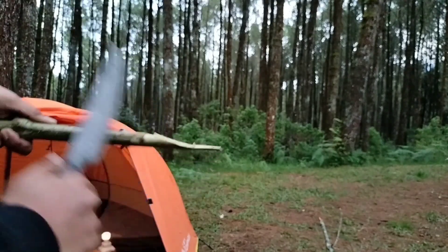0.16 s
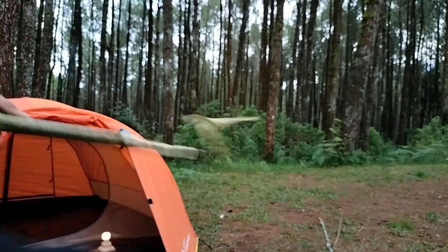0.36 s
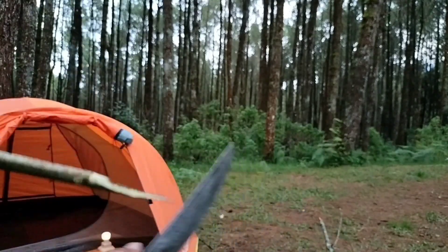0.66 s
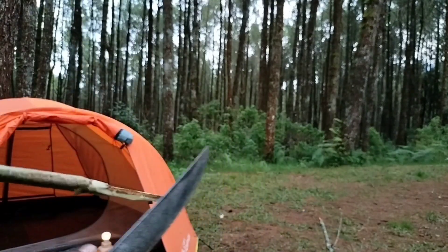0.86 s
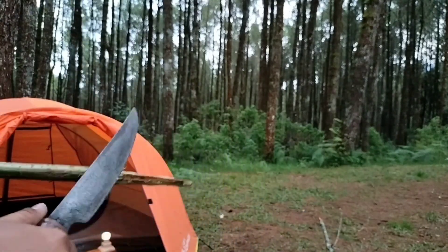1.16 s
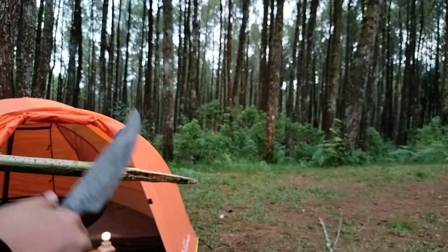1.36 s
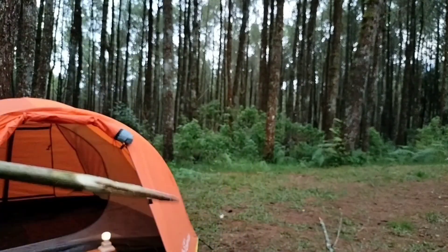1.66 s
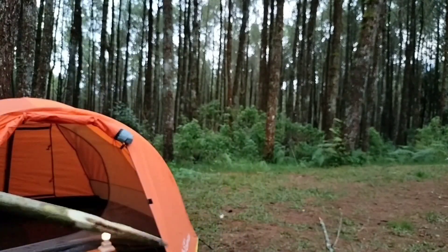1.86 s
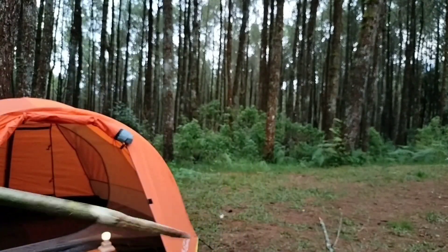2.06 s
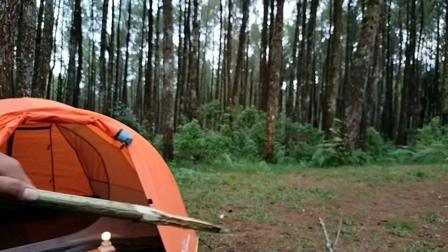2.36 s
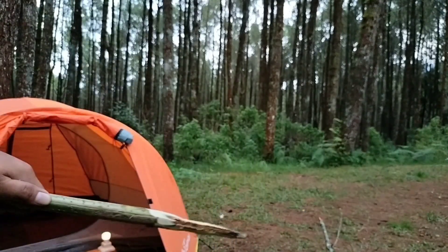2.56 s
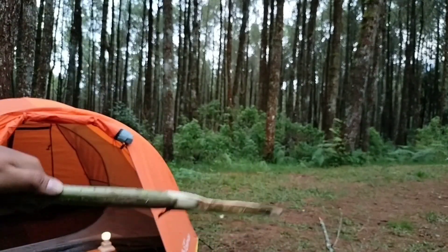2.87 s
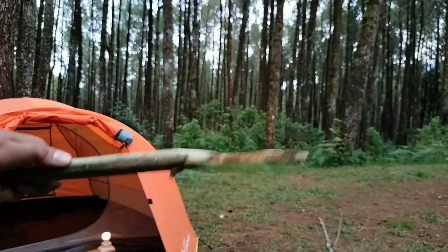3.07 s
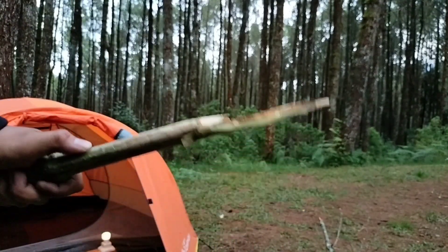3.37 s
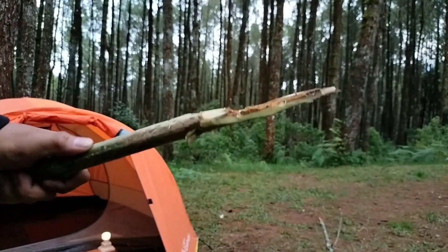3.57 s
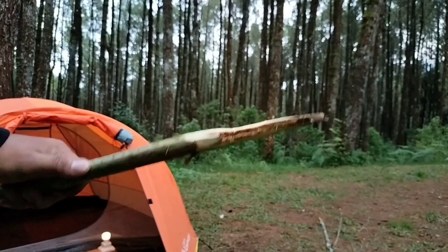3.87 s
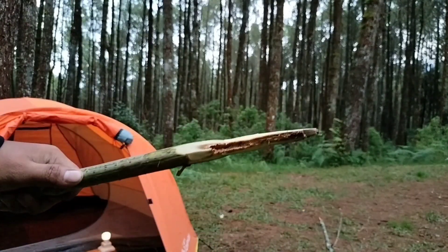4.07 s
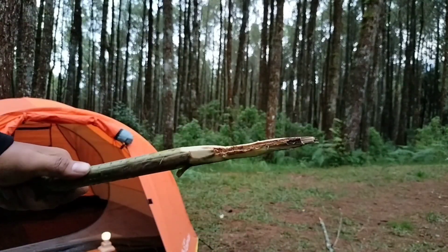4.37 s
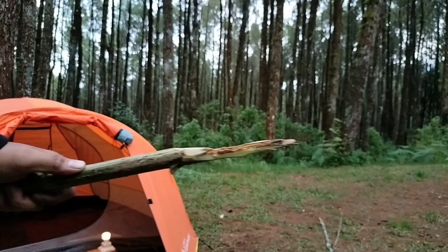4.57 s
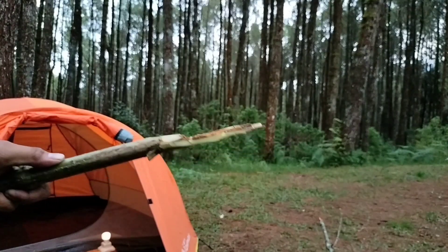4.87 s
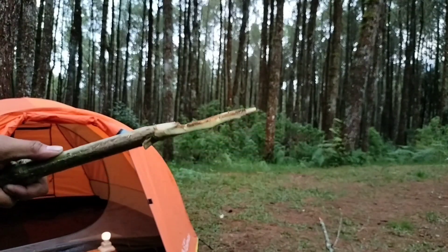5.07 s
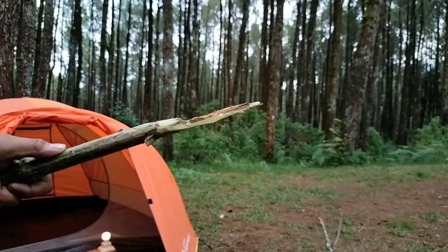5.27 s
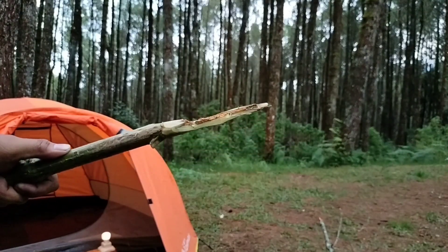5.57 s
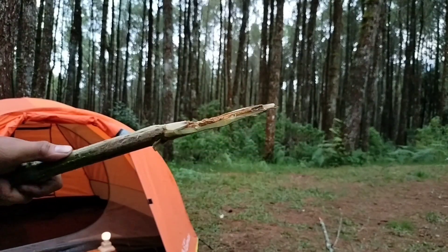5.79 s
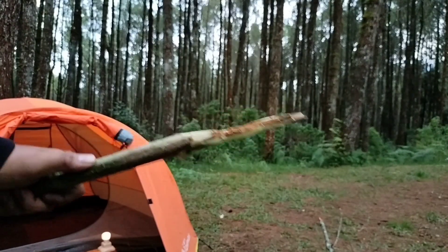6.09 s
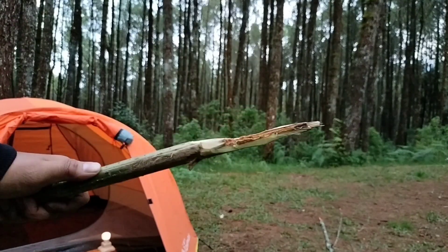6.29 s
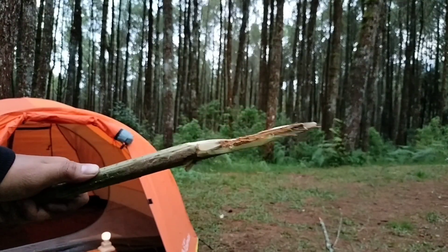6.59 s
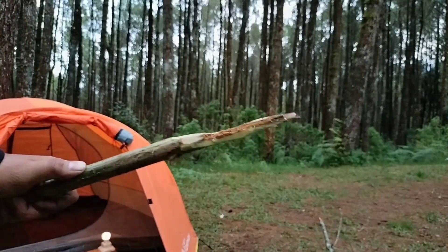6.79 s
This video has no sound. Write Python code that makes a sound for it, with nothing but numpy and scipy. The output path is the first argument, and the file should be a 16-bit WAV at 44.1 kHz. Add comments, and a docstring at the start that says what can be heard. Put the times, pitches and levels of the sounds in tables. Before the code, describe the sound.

Loud cicadas sing without pause among pine trunks, a near one buzzing in short rising calls about four or five times a second over a dense, shimmering chorus. Close to the microphone a knife chops a green stick twice, with a woody knock and tearing crackle; the first is brighter and briefly ducks the insects. Thin bird whistles follow, then faint bark rubbing and a few ticks near the end.

```python
"""Chopping green wood among cicadas

Two knife chops excite the damped modes of a green stick close by, and its tearing fibres crackle as
shaped noise; then a hand rubs the bark and ticks on the stick. Cicadas sing loudly among pine trunks: a
near caller's rising note carries tymbal-beat sidebands, a second caller is higher, and click trains,
chirps and wavering tones make up the chorus. Gliding sinusoids give a small bird's whistles and one short
cicada overtone chirp, over low rumble and faint hiss."""
import sys
import numpy as np
from scipy import signal
from scipy.fft import rfft, irfft, next_fast_len
from scipy.io import wavfile
from scipy.ndimage import uniform_filter1d, map_coordinates

SR = 44100
rng = np.random.default_rng(int(sys.argv[2]) if len(sys.argv) > 2 else 0)


def log_audio(samples):
    """Write samples as a 16-bit WAV file to the path given in sys.argv[1]."""
    # one column per channel
    frames = np.atleast_2d(samples).T
    # limit to full scale, then quantise
    limited = np.clip(frames, -1, 1)
    pcm = np.round(limited * 32767).astype(np.int16)
    wavfile.write(sys.argv[1], SR, pcm)


N = 306054
TIME = np.arange(N) / SR

# Blade meeting wood: (time [s], level [dB], thud frequency [Hz], ring level before a fixed cut [dB],
# crack frequency [Hz], crack level against the thud [dB])
BLADE_IMPACTS = [(.614, -14, 420, 0.5, 1990, 3.5), (0.619, -10, 427, -24, 2100, -24),
                 (0.6254, -19.5, 640, 8.5, 2370, 11), (1.856, -13, 690, 0, 1760, -2),
                 (1.864, -11, 547, -12, 2210, -17), (1.8729, -15, 450, -8, 1970, -9),
                 (1.883, -29, 580, -4, 2400, 0)]
# Modes of the stick: (frequency [Hz], relative level [dB], 60 dB decay time [s])
STICK_MODES = [(335, -7, .06), (440, -2, .08), (565, -3, .07), (630, -2, .1), (830, -2.5, .09),
               (1155, 0, .11), (1745, -2, .09), (2220, -4, .07), (2395, -1, .06)]
# Fibres tearing behind the blade: (time [s], bright snap level [dB], woody crunch level [dB],
# length before decay [s], 60 dB decay time [s])
FIBRE_TEARS = [(0.6195, -14, -27, 0.017, 0.03), (1.856, -31, -28, 0.006, .04),
               (1.865, -22.5, -27.5, 0.018, 0.1)]
# Short ringing snaps and ticks, splinters at the chops and later ticks of the hand on the stick:
# (time [s], snap level [dB], ringing frequency [Hz])
SNAPS_AND_TICKS = [(0.6225, -14.5, 6500), (0.6236, -21, 2650), (0.633, -25, 4500), (.635, -20, 9200),
                   (0.644, -27, 7800), (1.858, -26, 5660), (1.8654, -25, 4300), (1.8706, -35, 6300),
                   (1.874, -21, 6600), (1.8825, -31, 4560), (1.893, -26, 5100), (1.8998, -26, 6030),
                   (6.514, -23.5, 1930), (6.525, -38, 5200), (6.588, -28, 4700), (6.5936, -27, 2100),
                   (6.712, -33, 6160)]
TICK_T60_S, TICK_RING_DB = 0.015, 5  # ring level is against the snap
# Spectrum of the bright snaps: (frequency [Hz], relative level per Hz [dB])
SNAP_SPECTRUM = [(800, -38), (2500, 5), (4500, -3), (6500, 5.5), (8500, -5.5), (11000, -0.5), (14000, -1)]
# Spectrum of the woody crunch: (frequency [Hz], relative level per Hz [dB])
CRUNCH_SPECTRUM = [(120, -31), (350, -3), (600, 0.5), (830, 3), (1000, -6), (1200, -3), (1500, -0.5),
                   (2400, -9.5), (3500, -14), (7000, -32)]
# Hand rubbing on the bark: (middle time [s], level [dB], length [s])
GRIP_STROKES = [(2.92, -59, .14), (3.792, -49.5, 0.071), (6.203, -52, 0.17), (6.39, -47.5, 0.23),
                (6.517, -42, 0.033), (6.593, -42, 0.024), (6.736, -47, 0.085)]
# Spectrum of the rubbed bark: (frequency [Hz], relative level per Hz [dB])
BARK_SPECTRUM = [(150, -8), (290, -0.5), (520, -2), (800, -8), (1500, -7), (6000, -25), (14000, -37)]
# Light scrapes along the stick: (middle time [s], level [dB], length [s])
SCRAPE_STROKES = [(.34, -52, .08), (1.18, -43.5, 0.07), (2.23, -50, .05), (6.55, -44.5, 0.13),
                  (6.73, -48, .08)]
# Spectrum of the scrapes: (frequency [Hz], relative level per Hz [dB])
SCRAPE_SPECTRUM = [(800, -19), (4000, -5), (8500, -2), (11500, -2), (14000, -2.5)]

# Calls of the near cicada: (middle time [s], level [dB], length [s])
NEAR_CALLS = [(.172, -23, 0.084), (0.384, -21, 0.14), (0.576, -18, 0.081), (0.824, -20.5, 0.1),
              (1.046, -21, .12), (1.276, -21.5, 0.22), (1.498, -19.5, .12), (1.716, -18.5, 0.075),
              (1.935, -18.5, 0.082), (2.155, -21, .15), (2.377, -20, 0.087), (2.583, -22, 0.1),
              (2.821, -18.5, .14), (3.122, -21, 0.14), (3.384, -20, .1), (3.592, -20, 0.084),
              (3.817, -23.5, 0.27), (4.137, -21.5, 0.11), (4.349, -20.3, 0.18), (4.59, -19.5, 0.14),
              (4.814, -20, 0.11), (5.004, -20, 0.12), (5.243, -21.5, 0.25), (5.485, -19, 0.072),
              (5.733, -18, 0.13), (5.952, -18, 0.13), (6.159, -21, 0.15), (6.356, -20.5, .11),
              (6.633, -20, 0.18), (6.874, -18.5, 0.11)]
# Partials of its note: (multiple of the note [1], added tymbal beats [1], relative level [dB])
NOTE_PARTIALS = [(1, 0, -12.5), (1, 1, -22), (2, 0, 1), (2, 1, -6.5), (3, 0, -7.5), (3, 1, -18),
                 (4, 0, -20.5)]
# Partials of its second, slightly flat tymbal: (multiple of the note [1], relative level [dB])
FLAT_PARTIALS = [(1.95, -17), (2.93, -17), (3.91, -21)]
NOTE_HZ, BUZZ_HZ = 1512, 612  # note and tymbal beat, nominal at the middle of a call
GLIDE_PER_S = .24  # relative rise of pitch per second
CALL_HISS_DB = -30.5  # hiss during near calls, against the note
# Calls of the second cicada: (middle time [s], level [dB])
SECOND_CALLS = [(.109, -31), (.441, -23.5), (.579, -22), (.855, -29), (1.048, -22), (1.231, -26.5),
                (1.551, -18.5), (1.747, -21.5), (1.948, -21), (2.174, -17), (2.382, -23), (2.637, -24),
                (2.856, -24), (3.045, -21), (3.22, -21), (3.453, -27), (3.775, -20), (3.988, -18.5),
                (4.164, -29), (4.37, -21.5), (4.602, -28), (4.806, -27), (4.996, -19.5), (5.21, -21),
                (5.361, -23), (5.558, -21.5), (5.743, -25.5), (5.936, -18.5), (6.133, -20.5),
                (6.354, -17.5), (6.531, -20.5), (6.896, -21)]
SECOND_HZ, SECOND_LENGTH_S = 3210, .11  # pitch nominal at the middle of a call
# Body resonances of the cicadas: (centre [Hz], width [Hz], peak gain [dB])
BODY_RESONANCES = [(1361, 113, -25.5), (1575.6, 186, -13), (2030, 290, -19), (2237, 307, -25.5),
                   (2803, 160, -14.5), (3168, 477, -1.5), (3690, 500, -9.5), (4635, 470, -11),
                   (5250, 180, -17.5), (6134, 900, -24.5), (4950, 1040, -24.5)]

# Chorus: (time [s], level [dB], level change during the near caller's calls [dB])
CHORUS_LEVELS = [(0, -18.5, -1), (1.1, -19, 0.5), (2.2, -16.5, -0.5), (2.52, -20.5, -0.5),
                 (2.85, -18.5, 1.5), (3.3, -18, 0), (4.0, -17.5, 0), (4.3, -20.5, 3), (4.75, -21.5, 7),
                 (5.1, -19, 0.5), (5.35, -17, -1), (5.75, -19.5, 2.5), (6.3, -21.2, 4), (6.55, -17, -1),
                 (6.9, -19, 1)]
# Steady singers: (mean frequency [Hz], mean level before chorus scaling [dB])
STEADY_SINGERS = [(1596, -24.5), (2219, -31), (2781, -20), (3420, -14), (3800, -21), (4840, -26),
                  (4975, -28)]
# Gain of the far cicadas' direct sound added to their echoes: (frequency [Hz], gain [dB])
DIRECT_GAIN = [(1500, 7), (2400, -10.5), (6000, -13)]
# Colour of the far cicadas after the way through the forest: (frequency [Hz], relative gain [dB])
DISTANCE_COLOUR = [(1500, -2), (2400, -2), (3200, -2), (3800, -1.5), (4500, -2.5), (5000, -1), (7000, 1.5)]
# Reverberation among the trunks: (frequency [Hz], 60 dB decay time [s])
FOREST_DECAY = [(200, 0.091), (1500, 0.55), (4000, 0.27), (12000, 0.013)]

# Bird whistles and one short cicada overtone chirp near 6.1 kHz, each one glide: (start time [s],
# length [s], start pitch [Hz], pitch a third of the way [Hz], end pitch [Hz], level [dB])
WHISTLES_AND_CHIRP = [(2.886, .115, 6770, 6690, 6610, -31.5), (2.975, .105, 6660, 6700, 6750, -32),
                      (3.055, .1, 6760, 6750, 6720, -33.5), (3.14, .17, 6780, 6770, 6740, -44),
                      (3.83, 0.11, 6120, 6160, 6170, -36), (4.3, .33, 6500, 6385, 6230, -29.5),
                      (5.48, 0.29, 5970, 5850, 5780, -38.5)]
GLIDE_ATTACK_S, GLIDE_RELEASE_SHARE = .02, .45  # release is a share of the length
# Spectrum of the distant rumble: (frequency [Hz], relative level per Hz [dB])
RUMBLE_SPECTRUM = [(12, -60), (20, -38), (36, -12.5), (50, -5.5), (97, -1.5), (160, -1), (220, -7.5),
                   (334, -24.5), (553, -35.5), (612, -39.5), (885, -31), (1080, -48), (1430, -61.5),
                   (2420, -120)]
# Spectrum of the faint background hiss and of the hiss during near calls:
# (frequency [Hz], relative level per Hz [dB])
HISS_SPECTRUM = [(300, -7), (450, -1.5), (850, -2.5), (1050, -14.5), (4000, -11.5), (7400, -5.5), (8200, 0),
                 (9600, -5), (11000, -22), (14300, -10.5)]

# Gain control: trigger level of the treble [dB], cut per dB over it, attack [s], recovery [dB/s]
AGC_THRESHOLD_DB, AGC_SLOPE, AGC_ATTACK_S, AGC_RECOVERY_DB_PER_S = -17.5, 1, 0.016, 14
TOP_HZ = 14400  # upper band limit


def knife_and_ticks():
    """Impact excitation: the blade thuds and rings the stick, fibres crackle, and later the hand ticks."""
    envelopes, crackle = snaps_and_tears()
    snap, crunch, tick_ring = envelopes
    knocks = placed(blade_impacts() + tick_ring, lag_ms=-0.16)
    bright = snap * coloured(crackle, SNAP_SPECTRUM)
    return knocks + bright + crunch * coloured(crackle, CRUNCH_SPECTRUM)


def blade_impacts():
    """Modal superposition: each impact is a short thud, a crack and the stick's decaying modes."""
    knocks, t = np.zeros(N + SR), np.arange(SR // 4) / SR
    for s, db, thud_hz, ring_db, crack_hz, crack_db in BLADE_IMPACTS:
        ring = 0
        for hz, level, t60 in STICK_MODES:
            decay = amp(level + rng.normal(0, 1) - 60 * t / t60)
            ring += decay * np.sin(2 * np.pi * hz * rng.normal(1, 0.006) * t)
        thud = np.sin(2 * np.pi * thud_hz * t) * amp(-60 * t / 0.011)
        thud *= 1 - np.exp(-t / 0.0012)  # soft onset
        crack = np.sin(2 * np.pi * crack_hz * t) * amp(crack_db - 60 * t / 0.03)
        knocks[round(s * SR):][:len(t)] += amp(db) * (thud + amp(ring_db - 15.5) * ring + crack)
    return knocks[:N]


def snaps_and_tears():
    """Transient release: tears, snaps and ticks shape clumpy noise, and the snaps and ticks also ring."""
    snap, crunch, ring = np.zeros((3, N))
    for s, snap_db, crunch_db, length, t60 in FIBRE_TEARS:
        since = TIME - s
        rise = np.clip(since / (0.22 * length), 0, 1)
        tear = rise * amp(-60 * np.maximum(since - length, 0) / t60)
        snap += amp(snap_db) * tear
        crunch += amp(crunch_db) * tear
    for s, db, hz in SNAPS_AND_TICKS:
        burst = (TIME >= s) * amp(db - 60 * np.abs(TIME - s) / TICK_T60_S)
        snap += burst
        crunch += amp(-12) * burst
        ring += amp(TICK_RING_DB) * burst * np.sin(2 * np.pi * hz * (TIME - s))
    clumps = amp(3 * wobble(2500) + 2.2 * wobble(350))
    return (snap, crunch, ring), pair(side_db=-3) * clumps


def hand():
    """Friction: fingers rub dully on the bark, and light scrapes along the stick hiss brightly."""
    rub = strokes(GRIP_STROKES) * coloured(catches(per_s=160), BARK_SPECTRUM)
    return rub + strokes(SCRAPE_STROKES) * coloured(catches(per_s=1100), SCRAPE_SPECTRUM)


def catches(per_s):
    """Stick-slip: rough bark catches at random moments, over a soft rubbing hiss."""
    slips = unit((rng.random(N) < per_s / SR) * rng.standard_normal(N))
    return slips + amp(-6) * pair(side_db=-3)


def strokes(rows):
    """Contact pressure: one Gaussian swell for each (middle time [s], level [dB], length [s])."""
    return sum(amp(db) * np.exp(-(2 * (TIME - s) / length) ** 2) for s, db, length in rows)


def near_cicada():
    """Modulation: each call swells and climbs, while the tymbal beat adds sidebands and a rasp."""
    effort = calling(NEAR_CALLS)
    climb = climbing(NEAR_CALLS, scatter=.002)
    phase = 2 * np.pi * cycles(NOTE_HZ * climb * (1 + .005 * wobble(300)))
    beat_hz = BUZZ_HZ * climb * (1 + .004 * wobble(30))
    beat = 2 * np.pi * cycles(beat_hz)
    note = np.zeros(N)
    for multiple, beats, db in NOTE_PARTIALS:
        level = amp(db + 2.2 * wobble(120))
        note += level * np.sin(multiple * phase + beats * beat + .22 * wobble(150))
    for multiple, db in FLAT_PARTIALS:
        level = amp(db + 2.5 * wobble(120))
        note += level * np.sin(multiple * phase + 1.2 * wobble(150))
    note = effort * unit(note)
    note = placed(note, lag_ms=.287) + amp(-10) * trunks(note)
    clicks = placed(tymbal(beat_hz * (1 + .08 * wobble(300))), lag_ms=.295)
    rasp = unit(filtered(amp(-1.5) * clicks + pair(side_db=-3), body))
    rasp *= amp(1.9 * wobble(150))
    hiss = amp(CALL_HISS_DB) * coloured(pair(side_db=0.0), HISS_SPECTRUM)
    return note + effort * (amp(-6.5) * rasp + hiss)


def second_cicada():
    """Frequency modulation: a farther caller's single wavering note climbs in calls of its own timing."""
    effort = calling([(s, db, SECOND_LENGTH_S) for s, db in SECOND_CALLS])
    pitch = SECOND_HZ * climbing(SECOND_CALLS, scatter=.006) * (1 + .005 * wobble(300))
    tone = amp(2.5 * wobble(150)) * np.sin(2 * np.pi * cycles(pitch))
    note = effort * unit(tone)
    return amp(-5) * placed(note, lag_ms=.3) + amp(-5.5) * trunks(note)


def calling(rows):
    """Amplitude envelope: a swell of effort for each (middle time [s], level [dB], length [s])."""
    return sum(amp(db) * np.exp(-np.abs(2 * (TIME - s) / length) ** 2.5) for s, db, length in rows)


def climbing(rows, scatter):
    """Frequency glide: relative pitch climbs through each call from a slightly random start."""
    centres = np.array(rows)[:, 0]
    call = np.searchsorted((centres[1:] + centres[:-1]) / 2, TIME)
    offset = scatter * rng.standard_normal(len(centres))[call]
    return 1 + GLIDE_PER_S * (TIME - centres[call]) + offset


def tymbal(click_hz):
    """Buckling: a tymbal gives a train of clicks, each of a slightly different size."""
    clicks = np.diff(np.floor(cycles(click_hz)), prepend=0)
    return unit(clicks * amp(2.26 * rng.standard_normal(N)))


def body(hz):
    """Resonance: the cicadas' abdomens favour certain bands, whose powers add."""
    power = 0
    for centre, width, db in BODY_RESONANCES:
        power += amp(db - 3.2 * (2 * (hz - centre) / width) ** 2) ** 2
    return np.sqrt(power)


def chorus(count=8, throb_hz=4.6):
    """Incoherent summation: far cicadas throb at their own paces, blurred by scattering from the trees."""
    crowd, direct = np.zeros((2, N)), np.zeros(N)
    for pitch, pace, start in rng.uniform(-1, 1, (count, 3)):
        throb = np.sin(2 * np.pi * (throb_hz * (1 + .15 * pace) * TIME + start))
        click_hz = 330 * (1 + .4 * pitch) * (1 + .012 * throb + .013 * wobble(60))
        song = tymbal(click_hz) * amp(1.5 * throb)
        crowd += trunks(song)
        direct += song
    # the low part of their song bends round the trunks and arrives straight from the right
    crowd += placed(filtered(direct, lambda hz: amp(along(DIRECT_GAIN, hz))), lag_ms=0.29)
    crowd = coloured(filtered(crowd, body), DISTANCE_COLOUR) * amp(1.0 * wobble(130))
    crowd += amp(-4) * neighbours()
    crowd += steady_singers()
    return chorus_level() * unit(crowd)


def neighbours(count=7, low_hz=2860, high_hz=3640, calls_per_s=4.4):
    """Periodic chirps: cicadas at middle distance repeat a rising call, each at its own pitch and pace."""
    calls = np.zeros((2, N))
    pitches = np.linspace(low_hz, high_hz, count)
    for hz, (pace, start, side) in zip(pitches, rng.uniform(-1, 1, (count, 3))):
        turn = (calls_per_s * (1 + .15 * pace) * TIME + start + .1 * wobble(2)) % 1  # place in the call
        rise = GLIDE_PER_S * (turn - .5) / calls_per_s
        pitch = hz * (1 + rise + .008 * wobble(4) + .004 * wobble(250))
        swell = np.sin(np.pi * turn) ** 2 * amp(1.5 * wobble(4) + 2.5 * wobble(150))
        chirp = swell * np.sin(2 * np.pi * cycles(pitch))
        calls += placed(chirp, lag_ms=.2 + .15 * side)
    calls = filtered(calls, body)
    return unit(calls + trunks(calls))


def steady_singers():
    """Sustained tones: a few singers hold a wavering pitch and fade in and out."""
    singers = np.zeros((2, N))
    for hz, db in STEADY_SINGERS:
        phase = 2 * np.pi * cycles(hz * (1 + .005 * wobble(9) + 0.00623 * wobble(200)))
        fade_db = 2.8 * wobble(6) + 4.6 * np.array([wobble(25), wobble(25)])
        singers += amp(db + fade_db) * np.sin([phase, phase + 2 * wobble(12)])
    return singers


def chorus_level():
    """Amplitude modulation: the chorus level drifts, and rises or dips during the near caller's calls."""
    s, level_db, swell_db = np.transpose(CHORUS_LEVELS)
    in_step = calling([(middle, 0, length) for middle, _, length in NEAR_CALLS])
    return amp(np.interp(TIME, s, level_db) + np.interp(TIME, s, swell_db) * in_step)


def whistles_and_chirp():
    """Near-pure tones: thin, trembling bird whistles and one cicada overtone chirp glide among the trees."""
    song = np.zeros(N)
    for s, length, start_hz, turn_hz, end_hz, db in WHISTLES_AND_CHIRP:
        attack = (TIME - s) / GLIDE_ATTACK_S
        release = (s + length - TIME) / (GLIDE_RELEASE_SHARE * length)
        swell = np.clip(np.minimum(attack, release), 0, 1)
        glide = np.interp(TIME, [s, s + length / 3, s + length], [start_hz, turn_hz, end_hz])
        pitch = glide * (1 + .0015 * wobble(25) + .0045 * wobble(200))
        song += swell * amp(db + 1.7 * wobble(70)) * np.sin(2 * np.pi * cycles(pitch))
    return song * amp([[2], [-2]]) + amp(-5) * trunks(song)  # stronger on the left


def background():
    """Broadband noise: a distant low rumble lies under a faint hiss."""
    rumble_db = np.interp(TIME, [.8, 1.7], [-40, -38]) + 1.85 * wobble(8)
    rumble = coloured(pair(side_db=-18.0), RUMBLE_SPECTRUM) * amp(rumble_db)
    return rumble + amp(-48.5) * coloured(pair(side_db=1.5), HISS_SPECTRUM)


def trunks(x):
    """Scattering: trees return a decaying tail of echoes, different at each microphone."""
    hz, t, bins = signal.stft(rng.standard_normal((2, SR // 2)), SR, nperseg=256)
    decay = amp(-60 * t / along(FOREST_DECAY, hz)[:, None])
    tail = signal.istft(bins * decay, SR, nperseg=256)[1]
    return signal.fftconvolve(np.atleast_2d(x), tail / np.linalg.norm(tail[0]), axes=1)[:, :N]


def placed(x, lag_ms):
    """Time-of-arrival difference: a mono sound reaches the left microphone lag_ms after the right."""
    return filtered(x, lambda hz: np.exp(np.outer([-1, 1], 1j * np.pi * hz * lag_ms / 1000)))


def pair(side_db):
    """Mid-side stereo: white noise whose width is the level of side against mid."""
    mid, side = rng.standard_normal((2, N))
    return unit(np.array([mid + amp(side_db) * side, mid - amp(side_db) * side]))


def coloured(x, spectrum):
    """Spectral shaping: x weighted by a spectrum, at rms 1."""
    return unit(filtered(x, lambda hz: amp(along(spectrum, hz))))


def filtered(x, response):
    """Linear filtering: the spectrum of x times a response of frequency."""
    size = next_fast_len(N + 8192)  # padding limits wrap-around
    return irfft(rfft(x, size) * response(np.fft.rfftfreq(size, 1 / SR)), size)[..., :N]


def cycles(hz):
    """Phase as the integral of frequency, in cycles."""
    return np.cumsum(hz) / SR


def wobble(rate):
    """Random modulation: a smooth curve through rate random knots a second."""
    return map_coordinates(rng.standard_normal(int(N * rate / SR) + 4), [TIME * rate])


def along(points, hz):
    """Interpolation of (frequency [Hz], value) points on a logarithmic frequency axis."""
    f, v = np.transpose(points)
    return np.interp(np.log(hz + 1), np.log(f), v)


def unit(x):
    """Normalisation to rms 1."""
    return x / np.sqrt(np.mean(x ** 2) + 1e-20)


def amp(db):
    """Amplitude ratio of a level in decibels."""
    return 10 ** (np.asarray(db) / 20)


def scene():
    """Superposition: the stick close by adds to the forest all around."""
    stick = knife_and_ticks() + hand()
    insects = near_cicada() + second_cicada() + chorus()
    insects *= amp([[-.6], [.6]])  # slightly stronger on the right
    return stick + insects + whistles_and_chirp() + background()


def gain_control(x):
    """Dynamic compression: strong treble pulls the gain down, and it creeps back at a steady rate."""
    treble = filtered(x, lambda hz: hz > 6000)
    power = np.abs(uniform_filter1d(np.mean(treble ** 2, axis=0), size=441))  # 10 ms mean
    over_db = AGC_SLOPE * np.maximum(10 * np.log10(power + 1e-12) - AGC_THRESHOLD_DB, 0)
    recovered = AGC_RECOVERY_DB_PER_S * TIME
    cut_db = np.maximum.accumulate(over_db + recovered) - recovered
    keep = np.exp(-1 / (AGC_ATTACK_S * SR))
    return x * amp(-signal.lfilter([1 - keep], [1, -keep], cut_db))


def record(dry):
    """Limiting: the gain ducks under strong treble, peaks clip at full scale and the top band is cut."""
    clipped = np.clip(gain_control(dry), -1, 1)
    return filtered(clipped, lambda hz: 1 / (1 + (hz / TOP_HZ) ** 140))


dry = scene()
out = record(dry)
log_audio(out)
```